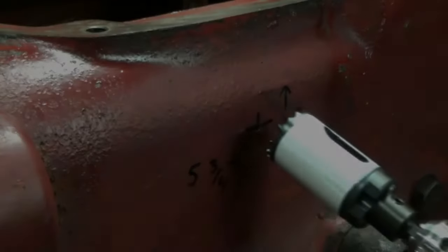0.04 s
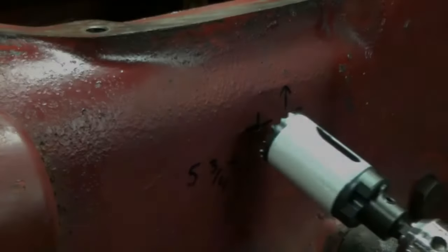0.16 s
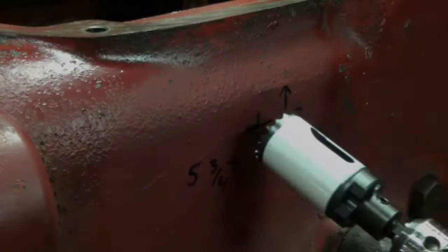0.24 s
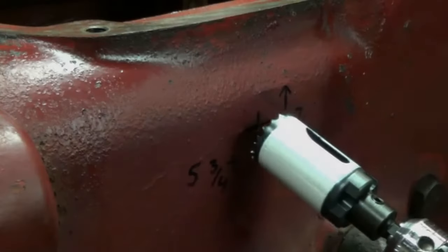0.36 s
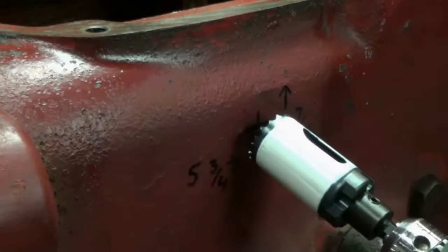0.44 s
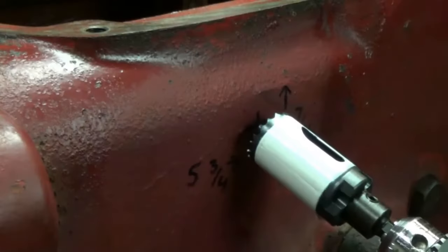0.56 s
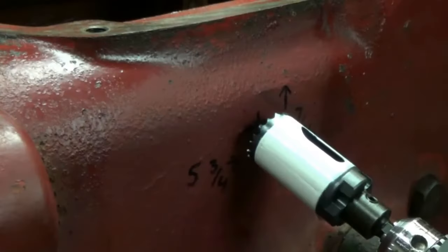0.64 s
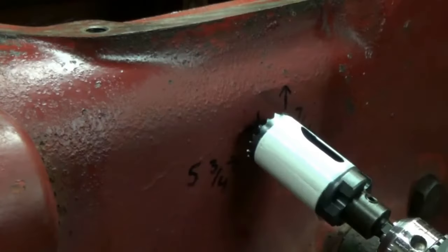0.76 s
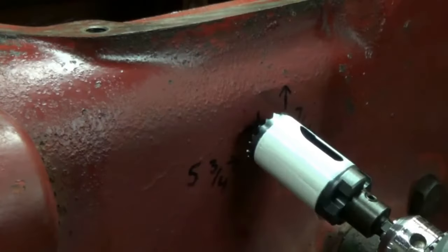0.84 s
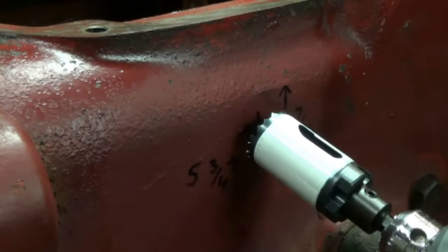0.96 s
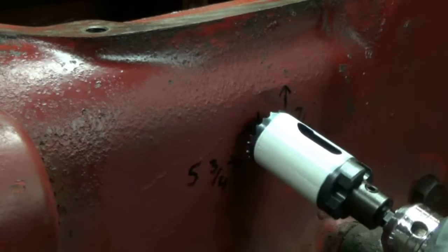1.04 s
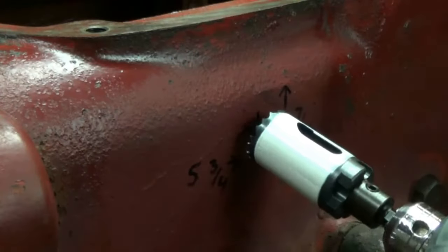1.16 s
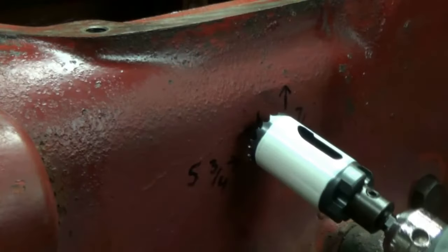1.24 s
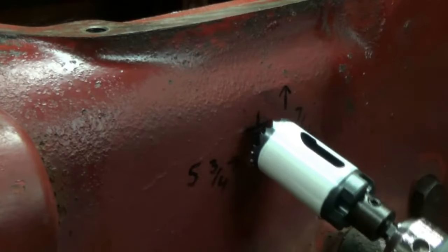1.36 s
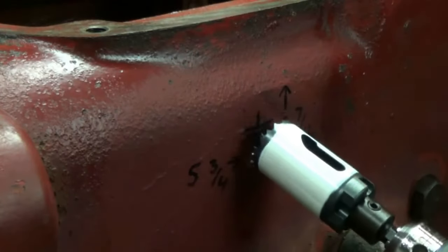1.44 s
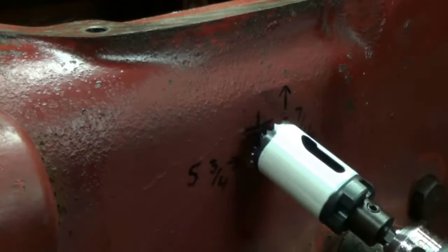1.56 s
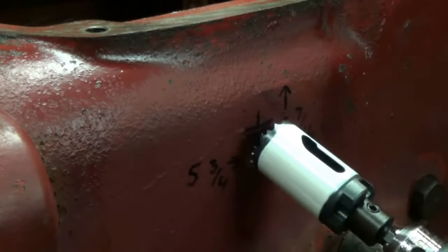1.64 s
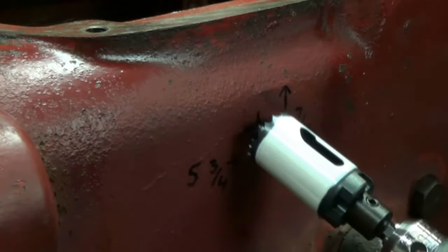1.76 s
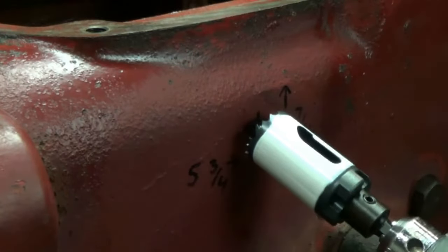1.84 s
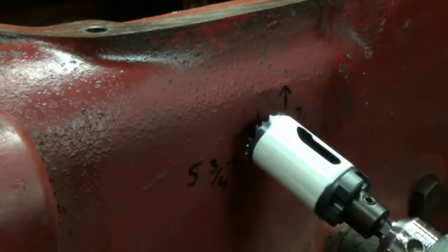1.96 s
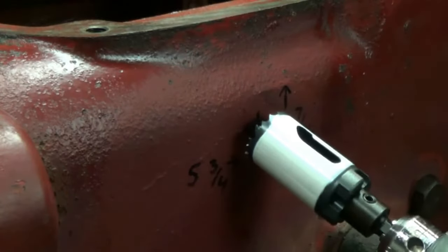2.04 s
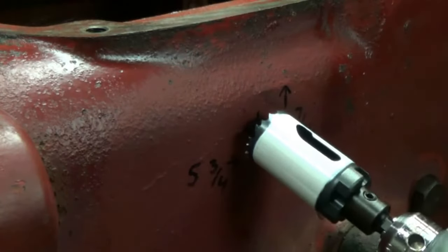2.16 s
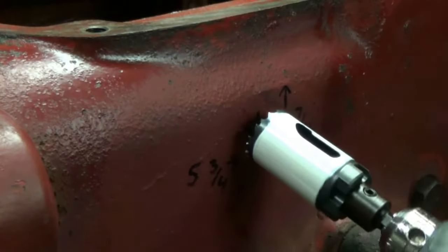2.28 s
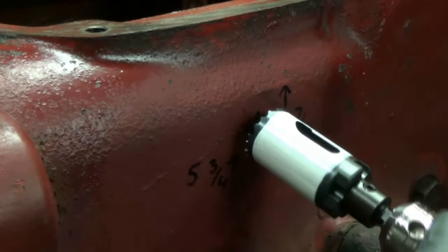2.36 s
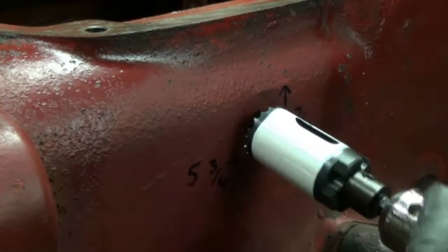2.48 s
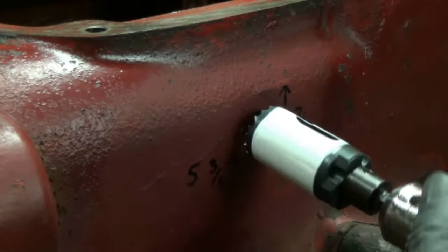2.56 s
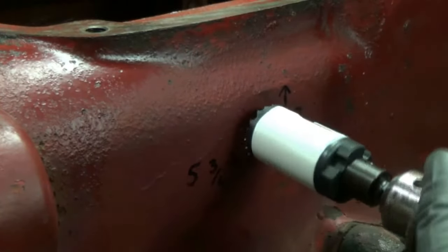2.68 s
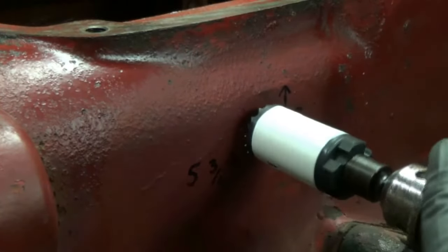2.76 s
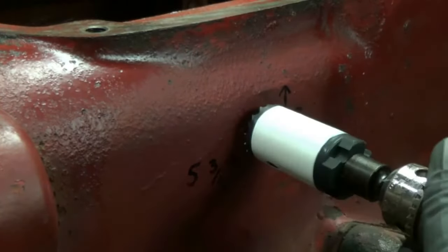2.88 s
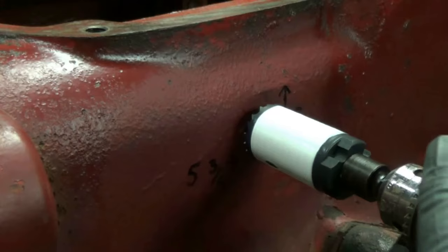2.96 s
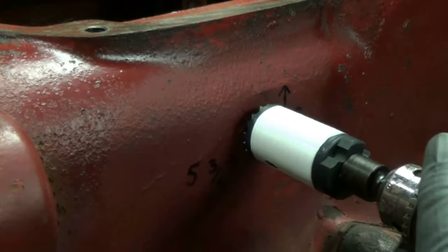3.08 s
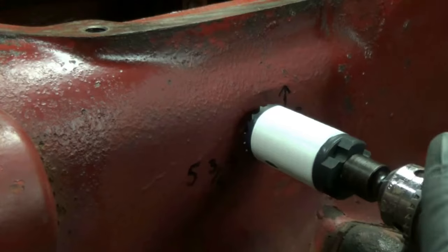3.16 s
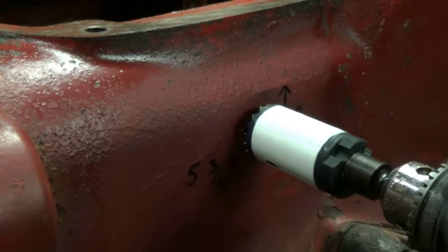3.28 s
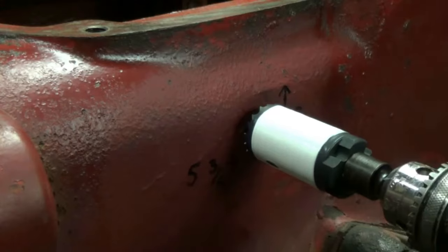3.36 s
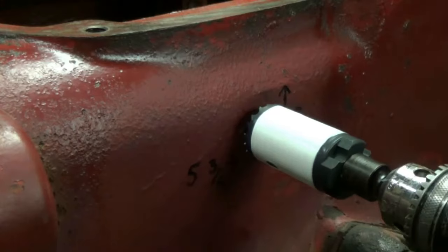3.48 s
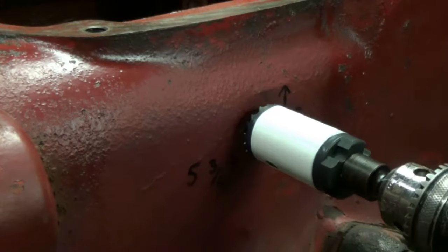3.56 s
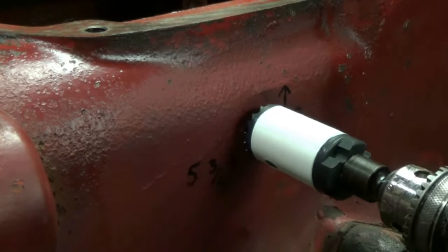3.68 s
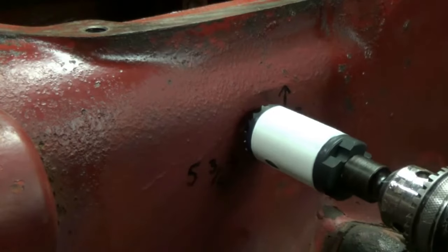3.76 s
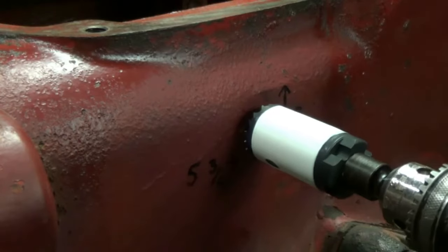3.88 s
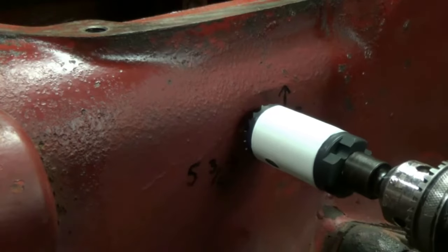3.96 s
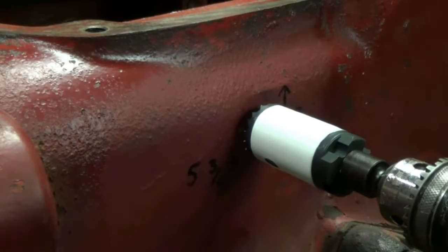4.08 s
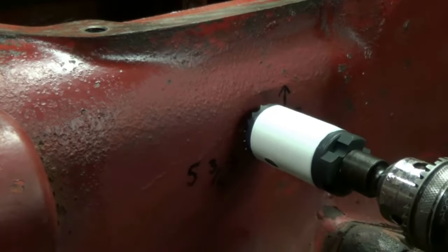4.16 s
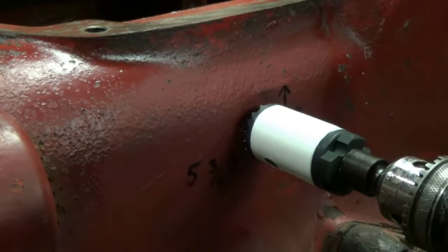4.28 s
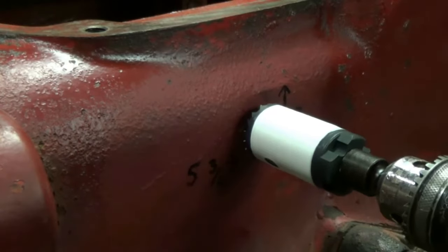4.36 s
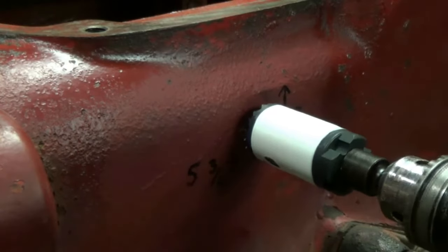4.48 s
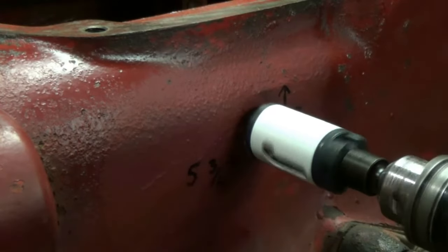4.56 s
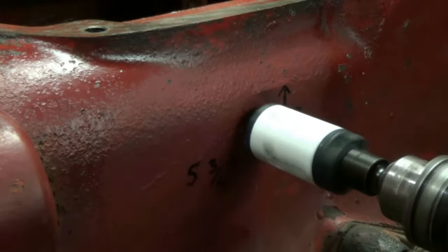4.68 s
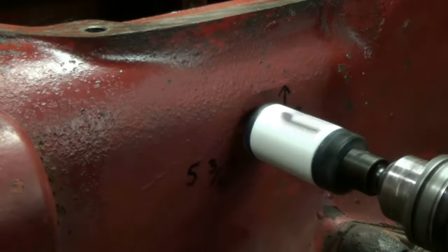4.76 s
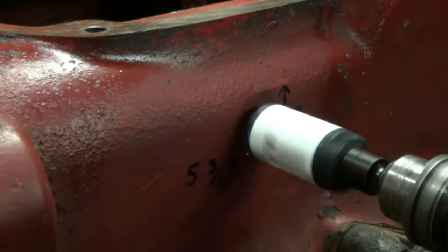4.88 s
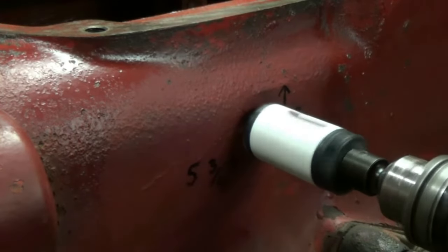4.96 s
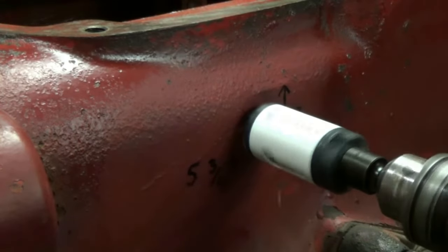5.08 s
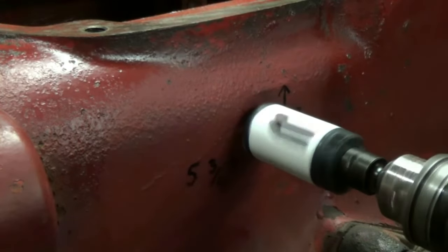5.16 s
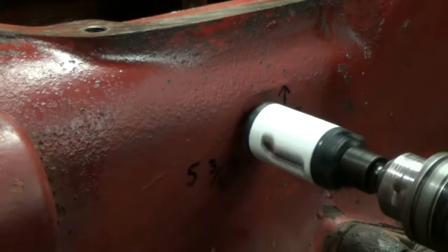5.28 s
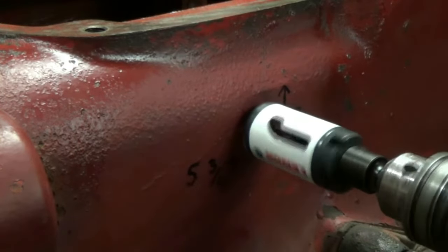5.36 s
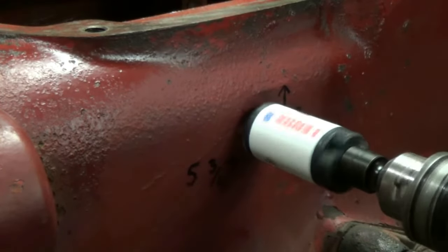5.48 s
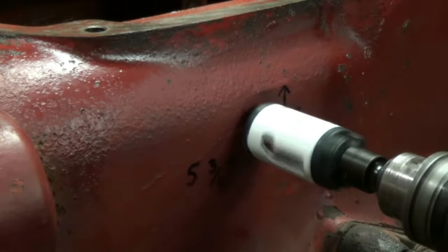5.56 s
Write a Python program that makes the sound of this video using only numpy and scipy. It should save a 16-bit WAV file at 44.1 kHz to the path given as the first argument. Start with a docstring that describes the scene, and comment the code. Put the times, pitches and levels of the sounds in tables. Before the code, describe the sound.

In a quiet workshop, a hole saw is lined up against a cast iron housing with light taps, soft scrapes, sharp little clicks and creaks from the drill body. Then the power drill kicks in, much louder, with rattling gears and a whine, while the teeth rasp and squeak on the metal. It coasts down with a ticking chatter and picks up again. The microphone is close, with the drill to the right.

```python
"""A hole saw on a mains drill, cutting at a cast iron housing, close to a stereo microphone in a quiet workshop.
The saw taps, scrapes and catches as it is lined up, and the drill body creaks. The trigger is squeezed:
the motor kicks on the mains pulses, spins up with rattling gears, coasts down and picks up again.
The teeth skate and snag on the iron, ringing the steel cup and the wall of the casting.
The drill sits to the right of the microphone, the saw near the middle."""
import sys
import numpy as np
from scipy import signal
from scipy.fft import rfft, irfft, next_fast_len
from scipy.io import wavfile
from scipy.ndimage import map_coordinates

SR = 44100
rng = np.random.default_rng(int(sys.argv[2]) if len(sys.argv) > 2 else 0)


def generate_wav(sig):
    """Save sig (samples, or channels by samples) to the path in sys.argv[1] as 16-bit PCM at SR."""
    pcm = np.round(np.clip(np.atleast_2d(sig).T, -1, 1) * 32767).astype(np.int16)
    wavfile.write(sys.argv[1], SR, pcm)


N = 248283
T = np.arange(N) / SR
MAINS_HZ = 60


def amp(db):
    """Decibels to gain."""
    return 10 ** (np.asarray(db) / 20)


def unit(x):
    """Scale to rms 1."""
    return x / np.sqrt(np.mean(x ** 2) + 1e-20)


def along(points, hz):
    """Read (freq_hz, value) points on a log frequency axis."""
    freqs, values = np.transpose(points)
    return np.interp(np.log(hz + 1), np.log(freqs + 1), values)


def wobble(rate):
    """A smooth random curve, rate knots a second."""
    coarse = T[::32]
    knots = rng.standard_normal(int(N * rate / SR) + 4)
    return np.interp(T, coarse, map_coordinates(knots, [coarse * rate]))


def stroke(start, length, attack_s, release_s):
    """An envelope that rises, holds for its length and dies away."""
    rise = 1 - np.exp(-np.maximum(T - start, 0) / attack_s)
    return rise * np.exp(-np.maximum(T - start - length, 0) / release_s)


def swelled(lower, upper, events, attack_s, release_s):
    """Add brief swells, in power, to the envelopes of two modes."""
    for start, length, lower_db, upper_db in events:
        swell = stroke(start, length, attack_s, release_s)
        lower = np.hypot(lower, amp(lower_db) * swell)
        upper = np.hypot(upper, amp(upper_db) * swell)
    return lower, upper


def coloured(x, colour, peaks=()):
    """Causal filter with a broad colour and resonances standing on it."""
    size = 2 * next_fast_len(x.shape[-1] // 2 + 4096)
    hz = np.fft.rfftfreq(size, 1 / SR)
    power = 1 + sum(amp(db + 4) ** 2 / (1 + (2 * (hz - mid) / width) ** 2) for mid, width, db in peaks)
    cepstrum = irfft(np.log(amp(along(colour, hz)) * np.sqrt(power)))
    cepstrum[1:size // 2] *= 2  # fold to minimum phase
    cepstrum[size // 2 + 1:] = 0
    return irfft(rfft(x, size) * np.exp(rfft(cepstrum)), size)[..., :x.shape[-1]]


def tilted(colour, tilt_db, pivot_hz):
    """A colour brightened by tilt_db a decade."""
    return [(hz, db + tilt_db * np.log10(hz / pivot_hz)) for hz, db in colour]


def impacts(rate, spread_db):
    """Random tiny blows, rate a second, of scattered size."""
    hits = (rng.random(N) < rate / SR) * rng.choice([-1, 1], N)
    return hits * amp(spread_db * rng.standard_normal(N))


def blow(colour, t60_s, peaks=()):
    """A short burst of contact noise through a body, peak 1."""
    t = T[:SR // 8]
    burst = coloured(rng.standard_normal(len(t)) * amp(-60 * t / t60_s), colour, peaks)
    return burst / np.abs(burst).max()


def add(track, start, sound):
    """Mix a sound into a track, start seconds in."""
    part = track[round(start * SR):][:len(sound)]
    part += sound[:len(part)]


# room tone around the microphone: freq_hz, level_db
AIR_COLOUR = [(12, -39), (20, -6), (49, -12), (70, 4), (103, -2), (352, -2.5), (491, -5), (565, -6.5),
              (881, -7.5), (958, -10), (1500, -9), (2540, -9), (4950, -16.5), (14300, -22), (15500, -20.5)]

def workshop():
    """Room air, widest in the midrange, with a faint regular ticking and two thin high tones."""
    middle, side = coloured(rng.standard_normal((2, N)), AIR_COLOUR)
    side = coloured(side, [(80, -18.5), (400, -8.5), (1200, -3.5), (4000, -4.5), (13000, -14)])
    air = amp(-57.5) * unit(middle + np.array([side, -side]))
    gate = np.maximum(np.cos(np.pi * MAINS_HZ * (T - .41)), 0) ** 16  # opens every second mains cycle
    ticking = amp(-58) * gate * np.sin(2 * np.pi * 3270 * T + 1.6 * wobble(150))
    wavering_tone = amp(-80) * np.sin(2 * np.pi * 11850 * T + wobble(60))
    steady_tone = amp(-73) * np.sin(2 * np.pi * 15735 * T)
    return air + ticking + wavering_tone + steady_tone


# spectrum of steel clacking on iron: freq_hz, level_db
TAP_COLOUR = [(100, -21), (400, -6), (800, -4), (1900, 3), (3700, -1.5), (5000, -9), (6500, -13),
              (10500, -21.5), (15000, -57)]
# what a tap rings in the saw and casting: pitch_hz, width_hz, level_db
TAP_MODES = [(785, 89, 0.5), (1170, 120, -3.5), (4300, 270, -5)]
# taps as the drill is lined up: start_s, level_db, tilt_db_per_decade
TAP_HITS = [(0.5411, -36.5, -16), (1.423, -42.5, -18), (1.8537, -21, 2), (1.856, -19.5, 4),
            (1.9008, -33, -1), (2.497, -36, -3), (2.505, -23.5, 5), (2.518, -26.5, -5.5), (3.675, -27, 1),
            (4.342, -26, 8), (4.3475, -19, 16)]

def taps():
    """Saw and chuck clack dryly on the iron; one tap leaves the cup free to ring."""
    track = np.zeros(N)
    for start, db, tilt_db in TAP_HITS:
        clack = blow(tilted(TAP_COLOUR, tilt_db, 2000), t60_s=0.031, peaks=TAP_MODES)
        add(track, start, amp(db - 2) * clack)
    add(track, 1.855, amp(-52) * cup_ring())
    return track


# soft rubs of the grip: centre_s, length_s, level_db
GRIP_RUBS = [(.63, 0.11, -59.5), (0.787, 0.13, -60), (1.622, 0.15, -58.5), (2.854, 0.069, -57.5),
             (3.722, 0.16, -57.5), (4.017, 0.61, -60)]

def grip():
    """Friction on the grip swells and fades in a soft rustle."""
    level = sum(amp(db) * np.exp(-(2 * (T - centre) / length) ** 2) for centre, length, db in GRIP_RUBS)
    colour = [(500, -9.5), (1500, -10), (2400, 0), (3500, -13.5), (6000, -18), (14000, -32)]
    return level * unit(coloured(impacts(3000, spread_db=5), colour))


# bright part of the rim's friction: freq_hz, level_db
HISS_COLOUR = [(1060, -4.5), (1800, 0), (4140, -2.5), (4530, -3.5), (5500, -2), (7380, -8.5), (10800, -4),
               (15000, -27)]
# dull part of the rim's friction: freq_hz, level_db
RUB_COLOUR = [(120, -56), (200, 8.5), (301, -19), (422, 9), (711, -1), (955, 2), (1180, -5), (1630, -6.5),
              (3000, -9), (3900, -4), (6600, -120)]
# resonances of the dragged saw: pitch_hz, width_hz, level_db
RIM_MODES = [(1640, 100, 16), (2300, 110, 13), (5100, 360, 1.5)]
# strokes of the rim over the paint: start_s, length_s, hiss_db, rub_db, ringing_db
RIM_DRAGS = [(1.24, 0.12, -58.5, -58.5, -1.5), (2.28, 0.36, -66, -66, -15), (2.644, .135, -58, -56.5, -9.5),
             (3.168, 0.22, -64.5, -54, -25), (3.33, 0.17, -53.5, -55.5, -27), (3.495, 0.1, -57.5, -48, -14),
             (3.587, 0.075, -50.5, -49.5, -11)]

def scrapes():
    """The rim slips over rough paint in tiny catches; some strokes ring, others are dull and damped."""
    track, n = np.zeros(N), SR // 2
    for start, length, hiss_db, rub_db, ringing_db in RIM_DRAGS:
        modes = [(hz, width, db + ringing_db) for hz, width, db in RIM_MODES]
        hiss = amp(hiss_db + 1.5) * unit(coloured(impacts(2500, spread_db=3.5)[:n], HISS_COLOUR, modes))
        rub = amp(rub_db - 7) * unit(coloured(impacts(900, spread_db=6.5)[:n], RUB_COLOUR, modes))
        hand_waver = amp(2.5 * wobble(46.5))
        pressure = stroke(0, length, attack_s=0.012, release_s=0.025) * hand_waver
        add(track, start, pressure[:n] * (hiss + rub))
    return track


# modes of the saw's steel cup: pitch_hz, level_db, t60_s
CUP_MODES = [(3860, -9.5, 1.2), (7500, -7, 0.36), (8510, -16, 0.27), (8880, 0, 0.18), (10142, -20, .25),
             (11062, -20, .25), (11220, -11, 0.3)]

def cup_ring():
    """The struck cup rings in decaying modes, each at a slightly random strength."""
    t = T[:SR // 2]
    return sum(amp(db + rng.normal(0, 1.6) - 60 * t / t60) * np.sin(2 * np.pi * hz * t)
               for hz, db, t60 in CUP_MODES)


# spectrum of one slip in the drill body: freq_hz, level_db
SLIP_COLOUR = [(80, -34), (250, -4.5), (420, 2.5), (700, 0.5), (980, 2), (1500, -12.5), (2500, -20),
               (5000, -27), (14000, -46)]
# creaks, the shortest a single knock: start_s, length_s, level_db, tilt_db_per_decade
BODY_CREAKS = [(2.137, .008, -43, -17), (2.533, .008, -39, 7), (2.673, .008, -44, -16),
               (3.385, 0.13, -38.5, 2), (3.565, .008, -38.5, 3), (3.818, .058, -31.5, 0),
               (3.945, 0.081, -42.5, -3)]

def creaks(gap_s=0.013, fade_db=7.5):
    """The drill body creaks in fading runs of dull slips."""
    track = np.zeros(N)
    for start, length, db, tilt_db in BODY_CREAKS:
        for age in np.arange(0, length, gap_s):
            late = gap_s * rng.uniform(-0.188, 0.201) * (age > 0)
            slip = blow(tilted(SLIP_COLOUR, tilt_db, 700), t60_s=0.04)
            add(track, start + age + late, amp(db - 2.5 - fade_db * age / length) * slip)
    return track


# resonances of the caught rim: pitch_hz, width_hz, level_db
CATCH_MODES = [(1940, 330, 10.5), (3000, 240, 13), (6000, 160, 3.8)]
# a quick run of catches: start_s, level_db
RIM_CATCHES = [(3.6148, -27.5), (3.6311, -26), (3.6495, -19.5), (3.655, -30), (3.662, -24), (3.6702, -26.5)]

def catches():
    """The rim catches in the chuck with sharp clicks as it is twisted."""
    track = np.zeros(N)
    for start, db in RIM_CATCHES:
        add(track, start, amp(db - 5) * blow(HISS_COLOUR, t60_s=0.018, peaks=CATCH_MODES))
    return track


# speed of the motor shaft: time_s, turns_per_s
SHAFT_SPEED = [(4.36, 11), (4.52, 107), (4.6, 122), (4.78, 193), (4.92, 180), (5.05, 149), (5.3, 112),
               (5.5, 108), (5.63, 190)]

def shaft_speed():
    """The motor spins up, coasts down and picks up again; turns a second at every sample."""
    return np.interp(T, *np.transpose(SHAFT_SPEED), left=0)


# squeezes of the trigger: start_s, length_s, rattle_db, rasp_db
TRIGGER = [(4.524, 0.657, -20, -25), (5.52, .1, -21, -35.5)]
FIRST_SQUEEZE_S = TRIGGER[0][0]

def rattle_level(attack_s=0.021, release_s=0.028, loose_turns_per_s=105):
    """Gears rattle more with speed until fully loose, and harder while the trigger loads them."""
    free = amp(-23.5) * np.minimum(shaft_speed() / loose_turns_per_s, 1) ** 2.02
    running = stroke(FIRST_SQUEEZE_S, T[-1], attack_s, release_s)
    loaded = sum(amp(db) * stroke(start, length, attack_s, release_s) for start, length, db, _ in TRIGGER)
    return np.hypot(free * running, loaded)


# spectrum of clashing gear teeth: freq_hz, level_db
GEAR_COLOUR = [(150, -40), (500, -13), (620, -5), (790, -6), (1000, -3.5), (1500, -1.5), (1950, -1.5),
               (2600, -0.5), (4200, -6), (5500, -10.5), (7000, -21.5), (10000, -18), (15000, -46)]
# resonances of the gearbox and casting: pitch_hz, width_hz, level_db
GEARBOX_MODES = [(625, 57, -3), (946, 47, -1.5), (1647, 140, 0), (2220, 104, -1.5), (2770, 52, -8),
                 (3116, 22, 1.5), (3820, 46, -3.5), (4370, 120, -4.5)]
# spectrum of the bearings' growl: freq_hz, level_db
BEARING_COLOUR = [(40, -26), (110, -25.5), (180, -8), (250, -8.5), (325, 2), (400, 0.5), (470, -1),
                  (700, -16), (2000, -67)]
# growl that follows the motor current: time_s, level_db
MOTOR_EFFORT = [(4.38, -56), (4.426, -64), (4.482, -47), (4.512, -51), (4.53, -42.5), (4.848, -36),
                (5.106, -42.5), (5.232, -55), (5.61, -44.5)]

def drill():
    """Gear teeth rattle faster with speed; a slow motor throbs with the mains, a fast one hums and whines."""
    speed = shaft_speed() * (1 + 0.0069 * wobble(40))
    angle = 2 * np.pi * np.cumsum(speed) / SR
    slow = np.clip(1 - speed / 210, 0, 1)
    growl = amp(np.interp(T, *np.transpose(MOTOR_EFFORT)) + 1) * (speed > 0)
    throb = amp(4 * slow * np.cos(2 * np.pi * MAINS_HZ * (T - 4.531)) + 0.43 * np.sin(angle))
    gears = coloured(impacts(45 * speed, spread_db=3) * throb, GEAR_COLOUR, GEARBOX_MODES)
    gears *= amp(-1.32) / np.std(gears[T > FIRST_SQUEEZE_S])
    pinion_whine = amp(-12 - 17 * slow + 1.6 * wobble(25)) * np.sin(9 * angle)
    # the small housing radiates slow turns poorly
    hum = amp(-4.5 - 27 * slow + 1.6 * wobble(30)) * np.sin(angle)
    hum += amp(-3 - 12 * slow + 1.5 * wobble(30)) * np.sin(2 * angle)
    bearings = unit(coloured(impacts(1500, spread_db=4.5), BEARING_COLOUR))
    rattle = np.hypot(rattle_level(), amp(7) * growl * slow)  # faint chatter as soon as current flows
    return rattle * (gears + pinion_whine) + growl * (bearings + hum)


# the saw biting into the casting: start_s, length_s, lower_mode_db, upper_mode_db
SAW_BITES = [(4.37, 0.066, -51, -60), (4.585, 0.055, -23.5, -25.5), (4.688, 0.05, -38, -23.5),
             (5.561, 0.039, -28, -24)]

def casting():
    """Countless tooth blows keep two modes of the iron wall ringing; they swell whenever the saw bites."""
    def ring(pitch_hz, width_hz):
        phase = 2 * np.pi * pitch_hz * T
        return unit(wobble(width_hz) * np.sin(phase) + wobble(width_hz) * np.cos(phase))

    shaking = rattle_level()
    lower, upper = swelled(amp(-17.5) * shaking, amp(-13.5) * shaking, SAW_BITES,
                           attack_s=0.0053, release_s=0.018)
    return amp(-3) * lower * ring(650, width_hz=95) + amp(-4) * upper * ring(1619, width_hz=85)


# gears slapping right through their backlash: start_s, level_db, tilt_db_per_decade
GEAR_SLAPS = [(4.479, -7, -3), (4.4816, -13.5, -1), (5.443, -8.5, 1)]

def kicks(count=6, soft_start_s=4.3815, hard_start_s=4.4955, hard_tilt_db=-8):
    """Mains pulses kick the gears: softly until the backlash is taken up, then duller and ever harder."""
    track = np.zeros(N)
    ages = np.arange(count) / MAINS_HZ
    for age, (late, scatter) in zip(ages, rng.standard_normal((count, 2))):
        kick = blow(GEAR_COLOUR, t60_s=0.044, peaks=GEARBOX_MODES)
        add(track, soft_start_s + age + 0.0013 * late, amp(-32.5 + 1.5 * scatter) * kick)
    rising_db = np.linspace(-18.5, -5.5, count)
    hard_kicks = [(hard_start_s + age, db, hard_tilt_db) for age, db in zip(ages, rising_db)]
    for start, db, tilt_db in hard_kicks + GEAR_SLAPS:
        kick = blow(tilted(GEAR_COLOUR, tilt_db, 2000), t60_s=0.029, peaks=GEARBOX_MODES)
        add(track, start, amp(db - 2.5) * kick)
    return track


# spectrum of teeth skating on iron: freq_hz, level_db
RASP_COLOUR = [(3000, -20), (6000, -7), (8000, -4.5), (9500, -3.5), (11000, 1.5), (12500, -5),
               (14000, -14.5), (16000, -25)]
# brief squeals of the cup: start_s, length_s, lower_partial_db, upper_partial_db
CUP_SQUEALS = [(4.624, 0.027, -27, -26), (4.668, 0.026, -39, -30), (4.88, 0.024, -27.5, -30),
               (5.01, 0.02, -45, -25), (5.1, 0.022, -45, -38), (5.158, 0.033, -27.5, -42),
               (5.225, .035, -35, -33), (5.272, 0.022, -27.5, -30)]

def skating_teeth():
    """The teeth rasp over the iron and keep the cup singing, fading as the saw coasts."""
    def sing(pitch_hz):
        return amp(2.2 * wobble(45)) * np.sin(2 * np.pi * pitch_hz * T + wobble(45))

    contact = sum(amp(db) * stroke(start, length, attack_s=0.079, release_s=0.18)
                  for start, length, _, db in TRIGGER)
    rasp = amp(-2.5) * contact * unit(coloured(impacts(6000, spread_db=4), RASP_COLOUR))
    lower, upper = swelled(amp(-17.5) * contact, amp(-15.5) * contact, CUP_SQUEALS,
                           attack_s=0.0056, release_s=0.0056)
    squeal = amp(4) * lower * sing(10142) + amp(2.5) * upper * sing(11222)
    beating = upper * (amp(-9) * sing(11062) + amp(-8) * sing(11300))  # modes beside the upper partial
    faint_modes = amp(-26) * contact * (sing(7562) + sing(8510) + sing(8893))
    return rasp + squeal + beating + faint_modes


# spectrum of one tooth snagging: freq_hz, level_db
TOOTH_COLOUR = [(500, -27.5), (3000, 2.5), (6500, -16), (8300, -3), (9500, -5), (10900, 5), (12300, -7.5),
                (14000, -25), (16000, -37)]
# single, separate tooth snags before and after the chatter: start_s, level_db
LONE_SNAGS = [(5.1254, -15), (5.1545, -11), (5.3409, -13.5), (5.355, -11), (5.3739, -9.5), (5.395, -8.5),
              (5.4198, -10.5), (5.442, -16)]

def snags(count=11, chatter_start_s=5.1995, first_gap_s=0.0068, gap_growth=1.085):
    """As the power drops, teeth snag and strike the cup, singly and in a slowing chatter."""
    gaps = first_gap_s * gap_growth ** np.arange(count)
    late, scatter = rng.standard_normal((count, 2)).T
    starts = chatter_start_s + np.cumsum(gaps) - gaps + 0.0008 * late
    chatter = list(zip(starts, -12 + 1.2 * scatter))
    clicks, strikes = np.zeros((2, N))
    for start, db in chatter + LONE_SNAGS:
        add(clicks, start, amp(db + 1.5) * blow(TOOTH_COLOUR, t60_s=0.0063))
        strikes[round(start * SR)] = amp(db - 32)
    return clicks + signal.fftconvolve(strikes, cup_ring())[:N]


def bump(start_s=5.145, pitch_hz=80, decay_s=0.0059):
    """A soft low bump as the drill shifts against the casting."""
    age = np.maximum(T - start_s, 0)
    return amp(-36) * (age / decay_s) ** 2 * np.exp(-age / decay_s) * np.sin(2 * np.pi * pitch_hz * age)


# decay of the workshop's reverberation: freq_hz, t60_s
ROOM_DECAY = [(150, 0.12), (1500, 0.23), (5000, 0.22), (12000, 0.17)]
# balance at the microphone for a lean of 1: freq_hz, right_minus_left_db
RIGHT_BALANCE = [(100, 3), (380, 1.5), (700, 1.5), (1300, 3.5), (2400, 2), (4400, 5.5), (8000, 3.5)]

def placed(x, lean, metal_db, room_db):
    """At the microphone: direct sound leaning right, reflections off nearby metal, the workshop's tail."""
    hz, t, spectrum = signal.stft(rng.standard_normal((2, SR // 3)), SR, nperseg=256)
    tail = signal.istft(spectrum * amp(-60 * t / along(ROOM_DECAY, hz)[:, None]), SR, nperseg=256)[1]
    age = T[:tail.shape[1]]
    tail *= age > .004
    size = next_fast_len(N + SR // 2)
    room = rfft(tail / np.linalg.norm(tail[0]), size)
    metal = rfft(rng.standard_normal(len(age)) * np.exp(-age / 0.0033) * (age > .001), size)
    metal = metal / np.abs(metal) * [[1], [-1]]  # opposite in the two channels, widening the sound
    paths = 1 + amp(metal_db) * metal + amp(room_db) * room
    balance = amp(lean * along(RIGHT_BALANCE, np.fft.rfftfreq(size, 1 / SR)) * [[-.5], [.5]])
    return irfft(rfft(x, size) * paths * balance, size)[:, :N]


def scene():
    """From the microphone: drill and handling to the right, the saw near the middle, room tone all round."""
    motor = placed(drill() + casting() + bump(), lean=0.99, metal_db=-11, room_db=-12.5)
    saw = placed(skating_teeth() + snags(), lean=0.092, metal_db=-30, room_db=-10)
    contacts = taps() + catches() + creaks() + kicks() + scrapes() + grip()
    handling = placed(contacts, lean=0.77, metal_db=-16, room_db=-10.5)
    return motor + saw + handling + workshop()


def record(dry, top_hz=15850):
    """The recorder keeps nothing above its band limit."""
    size = next_fast_len(N + SR // 4)
    passband = np.fft.rfftfreq(size, 1 / SR) < top_hz
    return irfft(rfft(dry, size) * passband, size)[:, :N]


dry = scene()
out = record(dry)
generate_wav(out)
```